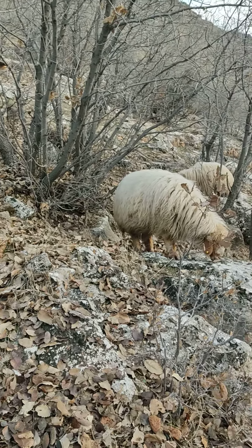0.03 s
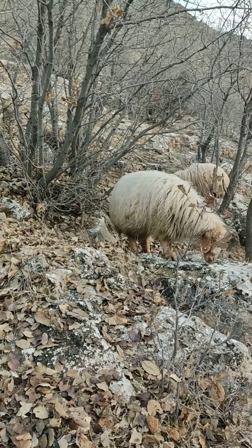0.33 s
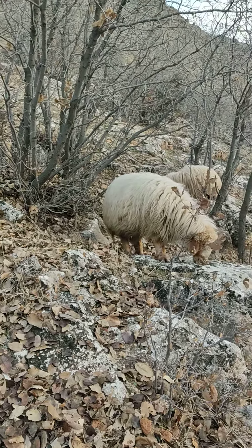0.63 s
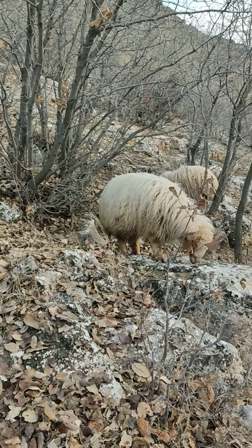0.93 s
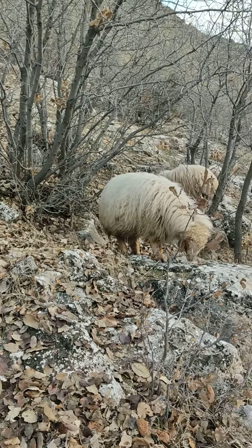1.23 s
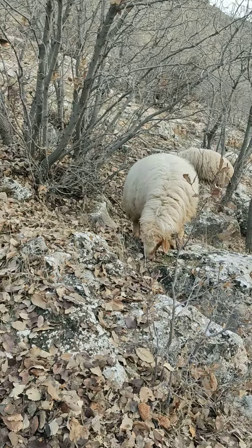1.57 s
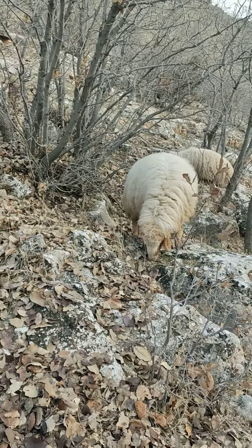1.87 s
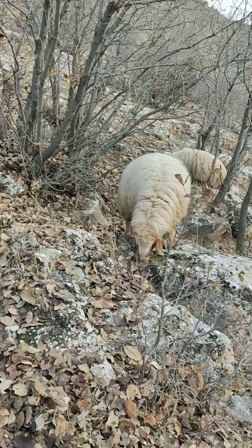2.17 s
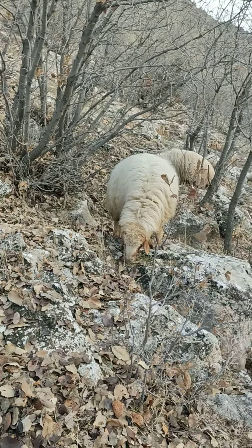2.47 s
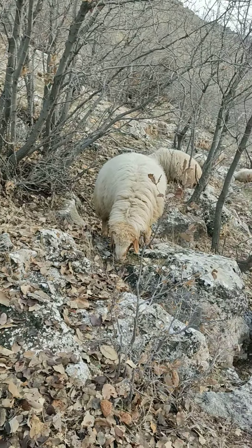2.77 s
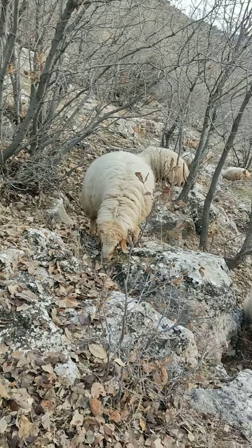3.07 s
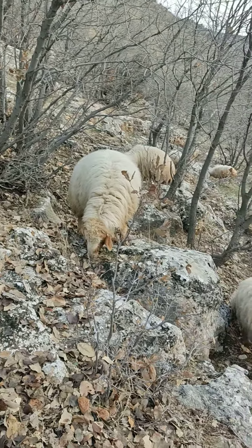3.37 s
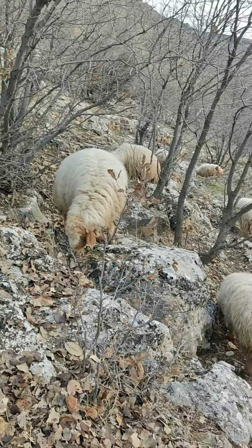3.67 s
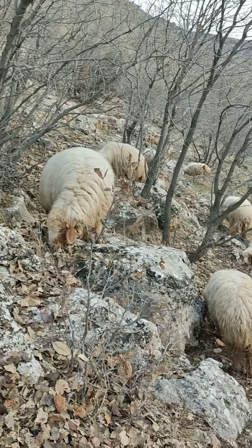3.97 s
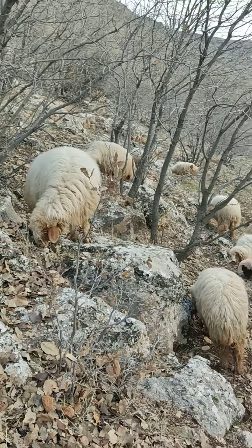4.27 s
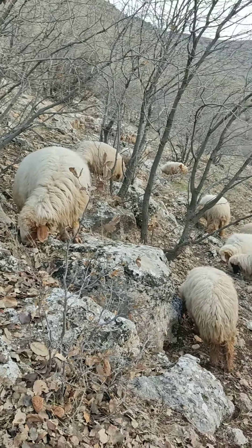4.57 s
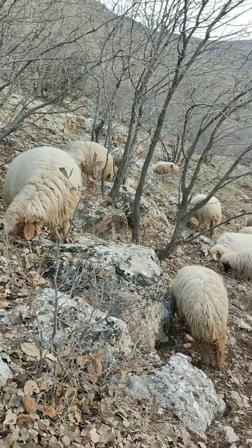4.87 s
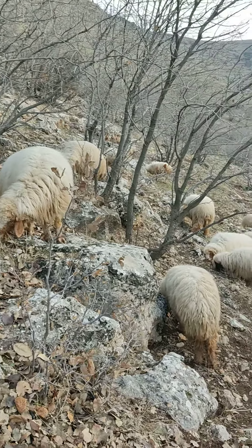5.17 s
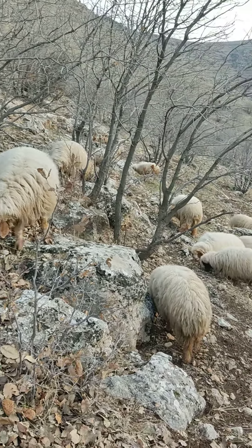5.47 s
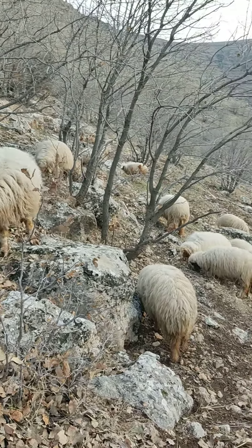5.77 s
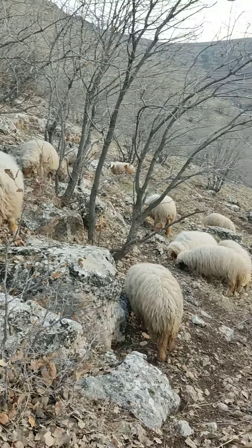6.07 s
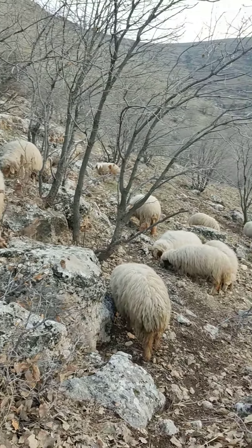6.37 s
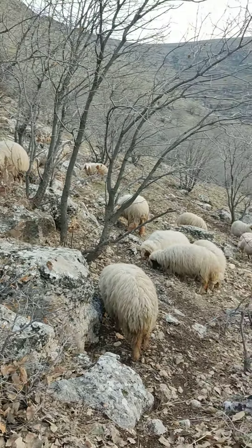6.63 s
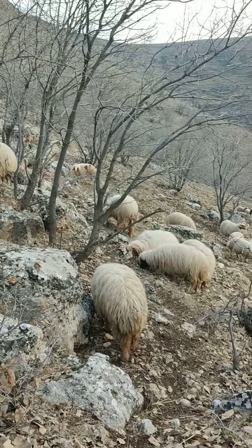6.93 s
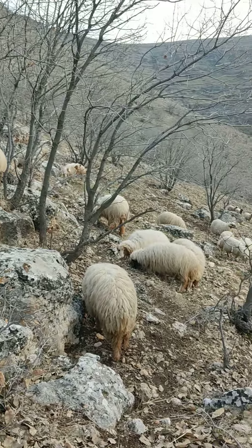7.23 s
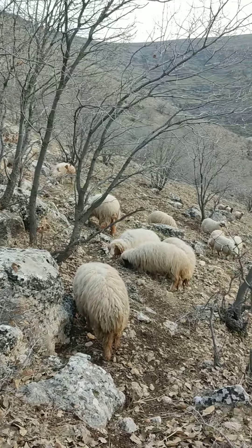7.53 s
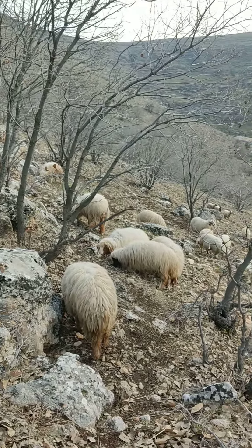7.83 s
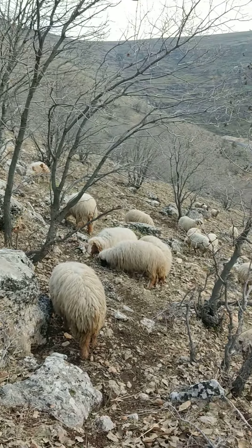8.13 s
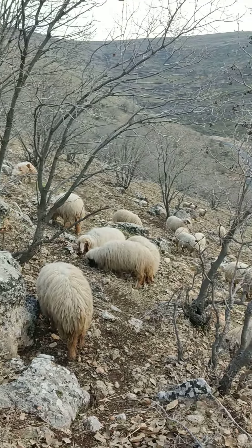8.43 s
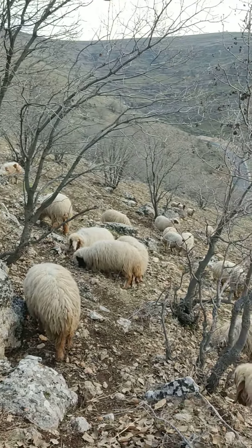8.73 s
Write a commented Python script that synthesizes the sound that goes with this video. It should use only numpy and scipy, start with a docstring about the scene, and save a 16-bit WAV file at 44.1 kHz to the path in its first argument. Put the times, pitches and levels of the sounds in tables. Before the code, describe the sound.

A light, gusty wind rumbles on a phone microphone for all nine seconds, shifting between left and right. It buffets with short, low thumps around 0.6 to 1.1 seconds, most strongly from 2.7 to 3.7, and again near 4.6, 6.3 and 8 to 8.6 seconds. Under it, grazing sheep stir dry leaves in a soft, continuous crackle that rises in small swells, with light hoof scuffs. Tiny, sharp twig snaps are scattered throughout, clearest near 2.7, 3.2 and 4.6 seconds. Dry stalks crunch now and then, most clearly at about 6.1, and hooves knock dully on stones near 0.1, 1.2, 2.2 and 6.7 seconds. A small, distant bird chirps very faintly at the start and around 2 seconds, three times between 6.3 and 6.9, and most clearly at about 8. A faint hush of far wind lies behind everything.

```python
"""First comes the low rumble of a light, gusty wind on a phone's two microphone openings, with dry leaves
rustling under the sheep that graze a hushed hillside. Hooves and muzzles stir the leaves into swells of
tiny cracks. Stalks crunch, hooves knock on stones and scuff the ground, and twigs snap.
A small bird chirps further off, and now and then a single swirl of air thumps the phone."""
import sys
import numpy as np
from scipy import signal
from scipy.fft import rfft, irfft
from scipy.io import wavfile
from scipy.ndimage import uniform_filter1d

SR = 44100
rng = np.random.default_rng(int(sys.argv[2]) if len(sys.argv) > 2 else 0)


def master_out(mix):
    """Clip the mix to full scale and print it as 16-bit PCM to the path in sys.argv[1]."""
    frames = np.transpose(np.atleast_2d(mix))
    ceiling = np.clip(frames, -1, 1)
    pcm = np.round(ceiling * 32767).astype(np.int16)
    wavfile.write(sys.argv[1], SR, pcm)


N = 396900  # samples: 9 seconds

# Levels are set before each sound's own gain and filters. Pan is left minus right: above 0 leans left.
# the breeze between gusts (time [s], level [dB], pan [dB])
BREEZE = [(0.0, -42, 3), (0.74, -43.5, 0), (1.4, -42.5, 1.5), (1.8, -44, 3.5), (2.23, -37, 8.5),
          (2.52, -44.5, 5.5), (3.3, -39.5, 2), (4.0, -45.5, -3), (4.3, -44, 11), (5.04, -46, 4.5),
          (5.35, -52, -7), (5.53, -39, 6.5), (5.83, -46, -4), (6.03, -48, -5), (6.29, -51, -7),
          (6.4, -40.5, 3.5), (6.94, -44, -4), (7.23, -51.5, -7), (7.36, -40.5, 2), (7.56, -56, 3),
          (7.7, -43, 3), (7.88, -49.5, 0), (8.1, -35.5, 3), (8.4, -47.5, -1.5), (8.6, -39, -5),
          (9.0, -43, -4.5)]
# gusts that reach the phone (time [s], length [s], level [dB], pan [dB])
GUSTS = [(0.121, 0.25, -49.5, 27), (0.572, 0.1, -37, 5.5), (0.686, 0.15, -38.5, 31),
         (0.943, 0.34, -43, 25.0), (1.368, 0.072, -48, 10), (1.541, 0.05, -45.5, 22.0),
         (2.188, 0.079, -49, 11), (2.334, 0.075, -44.5, -5.5), (2.44, 0.11, -57, 3),
         (2.608, 0.065, -42.5, 14), (2.71, 0.13, -37, 7.5), (2.87, 0.23, -36, 6.5),
         (3.111, 0.1, -38.5, 7.0), (3.35, 0.053, -47.5, 4), (3.47, 0.065, -41.5, 6),
         (3.696, 0.041, -42.5, -7), (3.842, 0.054, -45, -30), (4.109, 0.024, -40.5, -22),
         (4.143, 0.053, -39, 28), (4.262, 0.098, -54, 10), (4.375, 0.087, -47, 24.0),
         (4.494, 0.14, -45.5, 31.0), (4.807, 0.085, -52, 8), (4.975, 0.081, -48.5, 8.5),
         (5.502, 0.18, -50, -10), (5.765, 0.11, -45, -5.5), (6.113, 0.02, -45.5, -11),
         (6.322, 0.14, -39.5, -28), (6.685, 0.062, -40, -22), (6.794, 0.065, -43, 9),
         (6.943, 0.22, -54.5, 24), (7.294, 0.091, -46, 1.5), (7.633, 0.06, -54, -8),
         (8.029, 0.12, -45.5, -5), (8.196, 0.035, -34, -23), (8.249, 0.037, -35.5, 3),
         (8.51, 0.2, -43.5, -26.0), (8.787, 0.094, -43, -2.5)]
# tone of the large, slow swirls of air (frequency [Hz], level [dB])
SLOW_SWIRL_TONE = [(10, -8), (22, 5), (45, -1), (75, -3), (110, -16.5), (170, -40), (300, -61), (700, -76)]
# tone of the small, fast swirls of air (frequency [Hz], level [dB])
FAST_SWIRL_TONE = [(40, -5), (85, 1.5), (150, 3.5), (200, -2.5), (260, -13), (330, -22), (450, -31.5),
                   (1000, -45), (3000, -84)]
# tone of the far wind on the hill (frequency [Hz], level [dB])
HUSH_TONE = [(60, 3.5), (300, 0), (500, -5.5), (800, -8), (1300, -9), (2100, -11), (3300, -9),
             (4400, -13.5), (7500, -4.5), (9000, -11.5), (10000, -39), (15500, -50)]
# the whole flock's steady rustle (time [s], level [dB], crunch compared with that level [dB])
FLOCK = [(0, -58, -12), (0.42, -60.5, -10), (0.5, -63.5, -12), (0.6, -61, -14), (1.0, -60.5, -12),
         (1.39, -60, -9), (1.6, -59.5, -12), (3.15, -60, -11.5), (3.42, -61, -8), (3.6, -59.5, -12),
         (4.4, -60, -13), (5.0, -59.5, -17), (5.3, -58, -9.5), (7.15, -61, -11.5), (8.0, -60, -15.5),
         (9.0, -59.5, -7.5)]
# one sheep stirs the leaves (time [s], length [s], level [dB], crunch compared with that level [dB])
STIRS = [(0.162, 0.12, -58.5, -8.5), (0.293, 0.09, -54, -18), (0.54, 0.27, -59, -14),
         (0.86, 0.083, -56.5, -16), (1.025, 0.15, -58, -12), (1.163, 0.06, -50.5, -12.5),
         (1.294, 0.029, -58.5, -8), (1.453, 0.1, -52.5, -10.5), (1.585, 0.057, -53, -17),
         (1.685, 0.17, -55, -12), (1.9, 0.076, -59, -7.5), (2.18, 0.15, -57.5, -14),
         (2.353, 0.21, -56, -8.5), (2.64, 0.17, -57, -8), (2.908, 0.13, -50.5, -11), (3.06, 0.3, -59.5, -7),
         (3.53, 0.13, -55.5, -16), (4.063, 0.21, -57, -8), (4.271, 0.039, -52, -9),
         (4.653, 0.082, -54, -14), (4.779, 0.064, -58.5, -10), (5.082, 0.24, -53.5, -10),
         (5.385, 0.26, -55, -13.5), (5.717, 0.11, -54.5, -17), (5.864, 0.19, -54, -10.5),
         (6.05, 0.05, -51, -10), (6.15, 0.2, -56, -9.5), (6.44, 0.097, -58, -6.5), (6.701, 0.062, -57, -10),
         (6.81, 0.11, -55, -8), (6.998, 0.026, -59, -22), (7.468, 0.034, -55, -19),
         (7.553, 0.23, -58.5, -13.5), (7.928, 0.18, -62.5, -6.5), (8.121, 0.12, -57.5, -13),
         (8.437, 0.052, -56.5, -12), (8.717, 0.021, -55, -17)]
# where the rustle comes from (time [s], pan [dB])
LEAF_PAN = [(0.0, -0.5), (0.5, 1), (1.2, -3), (1.53, 1.5), (4.44, -1.5), (5.19, 1), (7.04, -1), (7.57, -4),
            (8.17, -2.5), (9.0, -3.5)]
# boost or cut of the rustle's highest treble (time [s], gain [dB])
LEAF_TREBLE = [(0, -1.5), (1.2, 0), (3.4, 0), (4.3, 1), (6.4, 0), (9, 0)]
# tone of dry leaves through each microphone opening (frequency [Hz], left level [dB], right level [dB])
LEAF_TONE = [(300.0, -4.5, -13), (670, -8.5, -8), (1200, -4.5, -13), (2390, -9, -12.5), (2590, -5, -13.5),
             (3590, -7, -13), (4400, -16, -12), (5440, -5, -8.5), (6520, -12, -6), (7290, -15.5, 0),
             (8210, -2, -11), (8970, -8.5, -17), (10100, -24.5, -28), (10800, -22, -25),
             (16000, -31.5, -33.5)]
# dry stalks crushed underfoot (time [s], level [dB], pitch [Hz], pan [dB])
STALKS = [(0.124, -47.5, 2900, 5), (1.096, -50.5, 3600, 12), (1.753, -51.5, 3000, 5), (2.143, -52, 3200, 6),
          (2.409, -48, 3200, 6), (2.853, -50.5, 3200, 8), (3.101, -52, 3200, 3), (3.214, -51.5, 3000, 6),
          (4.194, -49, 3200, 8), (4.298, -50, 2900, 6), (6.088, -43, 3100, 5), (6.739, -52, 3000, 3),
          (7.244, -54, 2900, 0), (7.827, -55, 3200, 9)]
# hooves hitting stones (time [s], level [dB], pitch [Hz])
KNOCKS = [(0.124, -51, 1150), (1.192, -50, 1100), (1.296, -54, 630), (1.931, -55, 1100), (1.964, -54, 1500),
          (2.229, -51, 1330), (3.215, -53, 1200), (5.088, -55, 900), (5.491, -53, 1100), (5.620, -55, 1100),
          (6.742, -48.5, 880)]
# twigs and stiff leaves snapping (time [s], level [dB], pitch [Hz], pan [dB])
SNAPS = [(0.1252, -46.5, 8490, 7), (0.388, -51, 8400, 1), (0.423, -51, 7800, 3), (1.611, -46, 8000, 4),
         (2.077, -49.5, 9000, 3), (2.14, -44.5, 8300, 0), (2.226, -45, 5270, -4), (2.371, -49, 7400, -1),
         (2.382, -50, 7400, -1), (2.671, -48, 7830, 6), (2.746, -42, 7440, 3), (2.803, -50, 7800, 2),
         (2.974, -46, 5000, -2), (3.2204, -41, 7620, 0), (3.720, -50, 7300, -6), (4.4332, -46.5, 7100, -4),
         (4.5673, -41.5, 7160, -2), (4.702, -46, 8200, 8), (5.087, -50, 8200, 7), (5.157, -46.5, 7750, 2),
         (5.494, -49, 5400, 0), (5.544, -44, 7380, -12), (6.089, -49, 5800, 5), (6.331, -46, 8400, 10),
         (6.374, -48, 6600, -8), (6.379, -45.5, 6300, -5), (7.498, -50, 7400, -12),
         (7.752, -45.5, 7300, -10), (8.119, -45.5, 7300, -7), (8.166, -48, 7400, 1),
         (8.177, -47.5, 8400, 10)]
# hooves dragging, dull on earth and bright on leaves
# (middle time [s], rise and fall time each [s], level [dB], pitch [Hz], grain rate [1/s])
TREADS = [(0.277, 0.11, -61, 420, 900), (0.356, 0.054, -58, 6800, 260), (1.209, 0.085, -48, 6900, 4700),
          (1.6, 0.17, -61, 3400, 200), (2.72, 0.1, -58, 7800, 150), (4.258, 0.16, -61.5, 2880, 350),
          (4.693, 0.027, -59, 4470, 790), (5.245, 0.29, -64.5, 1190, 740), (5.5, 0.09, -62, 2400, 160),
          (5.56, 0.08, -60, 6900, 200), (7.49, 0.032, -61, 3300, 700), (7.957, 0.059, -57, 5730, 230)]
# bird calls (time of the arch's top [s], level [dB], pan [dB])
CHIRPS = [(0.228, -63, 3), (1.77, -65.5, 3), (2.008, -66.5, 3), (6.294, -55.3, 7), (6.524, -58.3, 7),
          (6.873, -61.5, 3), (8.068, -51, 8)]
# a call's three notes: a short upward slide, a higher one over it, then an arch that rises and falls
# (time from the arch's top [s], pitch [Hz], level [dB])
UP_NOTE = [(-.056, 3350, -28), (-.046, 3800, -6), (-.033, 4050, -4.5), (-.026, 4100, -26)]
HIGH_NOTE = [(-.05, 4950, -21), (-.035, 5350, -4), (-.028, 5500, -28)]
ARCH_NOTE = [(-.035, 2850, -8), (-.024, 3300, -6), (-.014, 3780, 1.5), (-.007, 4110, 4.5), (.003, 4140, 3),
             (.012, 4000, -2), (.019, 3600, -26)]
# single swirls of air hitting the phone (time [s], level [dB], starting pitch [Hz], pan [dB])
THUMPS = [(0.64, -34, 175, 3), (0.713, -33, 196, 28), (1.042, -30.5, 279, 32), (1.085, -34.5, 174, 25),
          (2.2, -44, 300, 12), (2.764, -28, 197, -4), (3.04, -27.5, 150, 6), (3.19, -33.5, 294, 14),
          (3.482, -35, 223, 7), (3.5, -31, 95, 4), (3.725, -34, 117, -9), (4.591, -32, 201, 30),
          (5.83, -41, 105, -1), (6.24, -36.5, 120, -20), (6.362, -37, 149, -16), (6.439, -40, 202, -19),
          (6.692, -39, 200, -22), (6.811, -42.5, 218, 7), (7.346, -37.5, 230, 25), (7.636, -34, 125, -20),
          (7.816, -42.5, 206, -17), (8.05, -33.5, 120, -8), (8.103, -31, 150, 22), (8.203, -31, 136, -27),
          (8.268, -31.5, 179, 6), (8.602, -32, 243, -28)]


def gain(db):
    """Turn decibels into a number to multiply a sound by."""
    return 10 ** (np.asarray(db) / 20)


def unit(x):
    """Scale a signal to an average power of 1."""
    return x / np.sqrt(np.mean(x ** 2))


def curves(table):
    """Join a time table's points with straight lines, one curve for each column after the time."""
    times, *columns = np.transpose(table)
    return [np.interp(np.arange(N) / SR, times, column) for column in columns]


def sides(pan_db):
    """Left and right gains that move a sound sideways and keep its total power."""
    pair = np.vstack([gain(pan_db / 2), gain(-pan_db / 2)])
    return pair / np.sqrt(np.mean(pair ** 2, axis=0))


def shape_tone(x, points):
    """Turn frequencies up or down along a curve of (frequency [Hz], gain [dB]) points."""
    hz, db = np.transpose(points)
    bins_hz = np.maximum(np.fft.rfftfreq(x.shape[-1], 1 / SR), 1)
    curve_db = np.interp(np.log(bins_hz), np.log(hz), db)
    return irfft(rfft(x) * gain(curve_db), x.shape[-1])


def band(x, hz, octaves):
    """Keep the frequencies around hz, in a band this many octaves wide."""
    edges = hz * 2 ** (np.array([-1, 1]) * octaves / 2)
    return signal.sosfilt(signal.butter(1, edges, "bandpass", fs=SR, output="sos"), x)


def wander(rate):
    """A curve, about 1 in size, that glides to a new random value `rate` times a second."""
    hold = int(SR / rate)
    steps = np.repeat(rng.standard_normal(N // hold + 1), hold)
    return unit(uniform_filter1d(steps, hold)[:N])


def wander_pair(rate):
    """Separate wandering curves for left and right."""
    return np.array([wander(rate), wander(rate)])


def swell(s, length_s, rise_s, fade_s):
    """A loudness curve that rises around time s, holds for length_s and dies away."""
    t = np.arange(N) / SR - s
    return np.clip(.5 + t / rise_s, 0, 1) * np.exp(-np.clip((t - length_s) / fade_s, 0, 20))


def add(out, s, sound):
    """Mix a stereo sound in at time s."""
    start = max(int(s * SR), 0)
    part = sound[:, :max(N - start, 0)]
    out[:, start:start + part.shape[1]] += part


def swirls(tone, span_s):
    """Swirling air pushes on each microphone separately; its strength is evened out over span_s."""
    pressure = shape_tone(rng.standard_normal((2, N)), tone)
    return pressure / np.sqrt(uniform_filter1d(pressure ** 2, int(span_s * SR), axis=1))


def wind(lull_db=-17, puff_db=5, slow_growth=0.23, slow_db=-0.18, roll_db=2.5, fast_db=0.1, flutter_db=3.5):
    """Gusts and puffs ride on a breeze. Small swirls flutter with the flow; large ones roll, swelling less."""
    breeze_db, breeze_pan_db = curves(BREEZE)
    breeze = gain(breeze_db) * sides(breeze_pan_db)
    lull = breeze * gain(lull_db)
    power = (lull * gain(puff_db * wander_pair(12))) ** 2
    for s, length_s, db, pan_db in GUSTS:
        power += (gain(db) * sides(pan_db) * swell(s, length_s, rise_s=0.034, fade_s=0.012)) ** 2
    flow = np.sqrt(power)
    slow_flow = breeze * (flow / lull) ** slow_growth
    slow = swirls(SLOW_SWIRL_TONE, span_s=0.143) * slow_flow * gain(slow_db + roll_db * wander_pair(13))
    fast = swirls(FAST_SWIRL_TONE, span_s=0.0483) * flow * gain(fast_db + flutter_db * wander_pair(40))
    return slow + fast


def hill_hush(level_db=-60, pan_db=5.0, swell_db=1.25):
    """Far wind in bare trees; left and right are more alike in the lows than in the treble."""
    shared = shape_tone(rng.standard_normal(N), [(700, 2.5), (2000, -2.5), (5000, 0.0)])
    separate = shape_tone(rng.standard_normal((2, N)), [(700, 1.0), (2000, -4.0), (5000, 3.5)])
    hush = unit(shape_tone(shared + separate, HUSH_TONE))
    return hush * gain(level_db + swell_db * wander(2.475)) * sides(pan_db)


def leaf_cracks(per_s, spread_db, ring_s, range_hz, restless_db, octaves, scatter_db, leaf_sizes=20):
    """Tiny, uneven breaks. Each size of leaf has its own pitch and stirs in its own fits and starts."""
    out, t = np.zeros((2, N)), np.arange(SR // 30) / SR
    fade = np.exp(-t / ring_s) + gain(scatter_db) * np.exp(-t / .007)  # tail: scatter among the leaves
    for hz in np.geomspace(*range_hz, leaf_sizes):
        strength = gain(spread_db * np.minimum(rng.exponential(size=N), 3) + restless_db * wander(16))
        clicks = (rng.random(N) < per_s / leaf_sizes / SR) * strength * rng.choice([-1, 1], N)
        burst = rng.standard_normal((2, len(t))) * fade
        ring = unit(band(burst, hz, octaves)) * np.sqrt(hz)  # even power per Hz
        out += signal.oaconvolve(clicks[None], ring, axes=1)[:, :N]  # every click sets off the ring
    return unit(out)


def mic_openings(x):
    """Each microphone opening rings in its own way, so a crackle has a different tone on each side."""
    table = np.array(LEAF_TONE)
    return np.array([shape_tone(x[side], table[:, [0, side + 1]]) for side in range(2)])


def leaves(crunch_db=0.9, tick_db=-7.5, fast_flicker_db=0.9, slow_flicker_db=0.57):
    """Sheep stir the leaves: edges crackle brightly, brittle leaves tick and pressed ones crunch lower."""
    flock_db, flock_crunch_db = curves(FLOCK)
    crisp_power = gain(flock_db) ** 2
    crunch_power = gain(flock_db + flock_crunch_db) ** 2
    for s, length_s, db, stir_crunch_db in STIRS:
        stir_power = (gain(db) * swell(s, length_s, rise_s=0.037, fade_s=0.034)) ** 2
        crisp_power += stir_power
        crunch_power += stir_power * gain(stir_crunch_db) ** 2
    crisp = leaf_cracks(per_s=3000, spread_db=1.3, ring_s=0.0011, range_hz=(3500, 14000),
                        restless_db=1.9, octaves=0.5, scatter_db=-17)
    crisp = shape_tone(crisp, [(2000, 1.5), (3800, -1.5), (5200, -2.0), (15000, 2.5)])
    ticks = leaf_cracks(per_s=110, spread_db=1.9, ring_s=0.0009, range_hz=(4600, 10000),
                        restless_db=1, octaves=0.45, scatter_db=-20)
    crunch = leaf_cracks(per_s=800, spread_db=2.8, ring_s=0.0011, range_hz=(543, 3650),
                         restless_db=2.1, octaves=0.7, scatter_db=-18)
    crunch = shape_tone(crunch, [(150, 0), (450, 1.0), (3600, 0), (5200, -3.0), (8000, -21)])
    crisp, ticks, crunch = [unit(mic_openings(layer)) for layer in (crisp, ticks, crunch)]
    rustle = (crisp + ticks * gain(tick_db)) * np.sqrt(crisp_power)
    rustle += crunch * gain(crunch_db) * np.sqrt(crunch_power)
    (pan_db,), (treble_db,) = curves(LEAF_PAN), curves(LEAF_TREBLE)
    treble = shape_tone(rustle, [(9000, -40), (10500, 0)])
    rustle += treble * (gain(treble_db) - 1)
    flicker = gain(fast_flicker_db * wander(70) + slow_flicker_db * wander(14))
    return rustle * flicker * sides(pan_db)


def stalk_crunches(crush_s=0.005, octaves=1.1):
    """A hollow stalk gives way all at once: a sharp crunch, lower than a twig's snap."""
    out, t = np.zeros((2, N)), np.arange(SR // 25) / SR
    fade = np.exp(-t / crush_s)
    for s, db, hz, pan_db in STALKS:
        burst = rng.standard_normal((2, len(t))) * fade
        crunch = unit(band(band(burst, hz, octaves), hz, octaves))
        add(out, s, crunch * np.sqrt(np.mean(fade ** 2)) * gain(db) * sides(pan_db))
    return out


def hoof_knocks(ring_s=0.0062, octaves=0.79, pan_db=5):
    """A hoof hits a loose stone: a short, dull clack."""
    out, t = np.zeros((2, N)), np.arange(SR // 16) / SR
    for s, db, hz in KNOCKS:
        noise = rng.standard_normal((2, len(t)))
        clack = unit(band(band(noise, hz, octaves), hz, octaves)) * np.exp(-t / ring_s)
        add(out, s, clack * gain(db) * sides(pan_db))
    return out


def twig_snaps(gain_db=7, ring_s=0.0017, shiver_db=-20, shiver_s=0.016):
    """A twig's fibres break in one short burst, and the leaves around it shiver."""
    out, t = np.zeros((2, N)), np.arange(SR // 16) / SR
    fade = np.exp(-t / ring_s) + gain(shiver_db) * np.exp(-t / shiver_s)
    for s, db, hz, pan_db in SNAPS:
        fibres = band(rng.standard_normal((2, len(t))), hz, octaves=0.65)
        burst = mic_openings(fibres) * fade
        burst *= np.sqrt(np.mean(fade ** 2) / np.mean(burst ** 2, axis=1, keepdims=True))  # equal sides
        add(out, s, burst * gain(db + gain_db) * sides(pan_db))
    return shape_tone(out, [(8800, -3.0), (11000, -7.0)])


def hoof_treads(octaves=0.54, spread_db=4.0, pan_db=3):
    """A hoof sinks in: a swell of separate, gritty clicks around one pitch."""
    out = np.zeros((2, N))
    strength = rng.choice([-1, 1], (2, N)) * gain(spread_db * rng.standard_normal((2, N)))
    chance = rng.random(N)
    for s, rise_s, db, hz, per_s in TREADS:
        start = max(int((s - rise_s) * SR), 0)
        rise_and_fall = np.hanning(int(2 * rise_s * SR))
        grains = (strength * (chance < per_s / SR))[:, start:start + len(rise_and_fall)]
        scuff = unit(band(band(grains + 1e-9, hz, octaves), hz, octaves))
        add(out, start / SR, scuff * rise_and_fall * gain(db) * sides(pan_db))
    return shape_tone(out, [(8500, 0), (10000, -16)])


def bird(echo_db=-8, echo_s=0.035, waver=0.012, pitch_spread=0.0028, length_spread=0.0775):
    """Wavering whistles, a little different each time, blurred by echoes from trunks and rocks."""
    out, t = np.zeros((2, N)), np.arange(-SR // 14, SR // 14) / SR
    for (s, db, pan_db), (stretch, detune) in zip(CHIRPS, rng.standard_normal((len(CHIRPS), 2))):
        bend = 1 + pitch_spread * detune + waver * wander(500)[:len(t)]
        for note in (UP_NOTE, HIGH_NOTE, ARCH_NOTE):
            times, hz, note_db = np.transpose(note)
            times = times * np.exp(length_spread * stretch)
            phase = 2 * np.pi * np.cumsum(np.interp(t, times, hz) * bend) / SR
            loudness = np.interp(t, times, gain(note_db), left=0, right=0)
            add(out, s + t[0], np.sin(phase) * loudness * gain(db) * sides(pan_db))
    delay_s = np.arange(SR // 3) / SR
    echoes = rng.standard_normal((2, len(delay_s))) * np.exp(-delay_s / echo_s)
    echoes /= np.sqrt(np.sum(echoes ** 2) / 2)
    return out + gain(echo_db) * signal.oaconvolve(out, echoes, axes=1)[:, :N]


def wind_thumps(gain_db=1, rise_s=0.0052, slowing_s=0.085, wobble=0.15):
    """One swirl hits a microphone opening: a few uneven swings of pressure that slow down and die away."""
    out, t = np.zeros((2, N)), np.arange(SR // 10) / SR
    rise_and_fall = t / rise_s * np.exp(1 - t / rise_s)
    for s, db, start_hz, pan_db in THUMPS:
        unevenness = np.exp(wobble * wander(300)[:2 * len(t)].reshape(2, -1))
        hz = start_hz * np.exp(-t / slowing_s) * unevenness
        pressure = np.sin(2 * np.pi * np.cumsum(hz, axis=1) / SR) * rng.choice([-1, 1], (2, 1))
        add(out, s, pressure * rise_and_fall * gain(db + gain_db) * sides(pan_db))
    return out


def scene():
    """Wind at the phone, the flock in the leaves, and the bird and the hill behind."""
    air = wind() + wind_thumps()
    sheep = leaves() + hoof_treads() + twig_snaps() + stalk_crunches() + hoof_knocks()
    return air + sheep + bird() + hill_hush()


def record(dry):
    """The phone cuts off the highest treble."""
    cutoff_hz = 15700
    return signal.sosfilt(signal.ellip(10, .2, 70, cutoff_hz, fs=SR, output="sos"), dry)


dry = scene()
out = record(dry)
master_out(out)
```